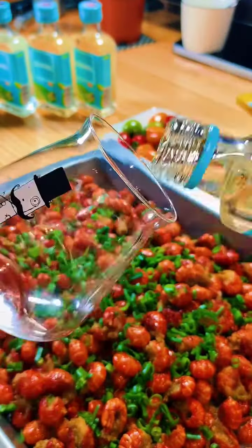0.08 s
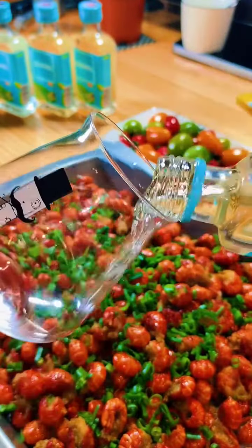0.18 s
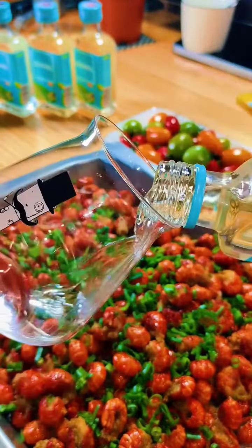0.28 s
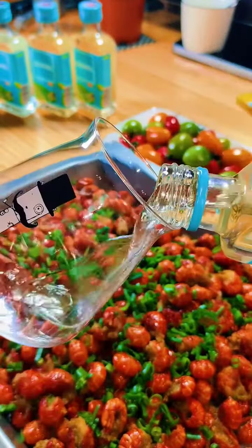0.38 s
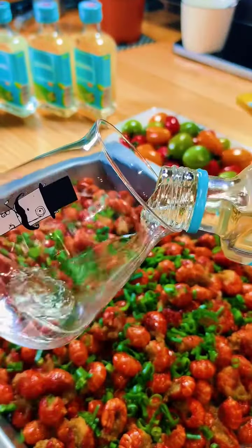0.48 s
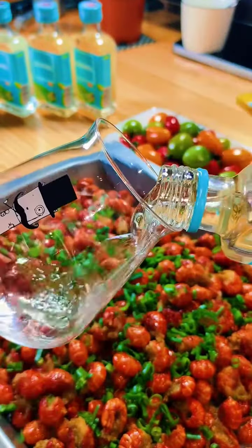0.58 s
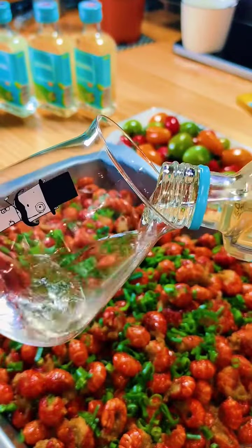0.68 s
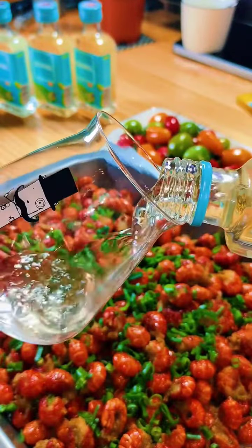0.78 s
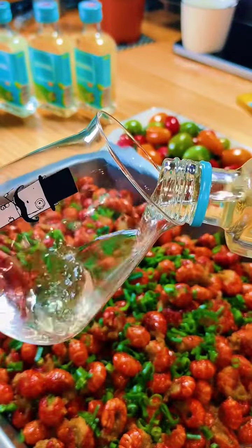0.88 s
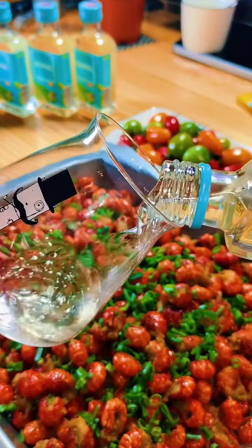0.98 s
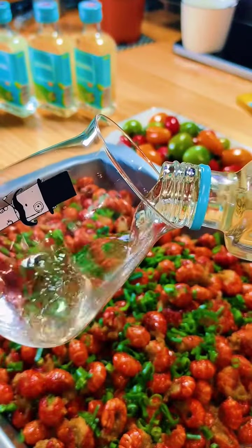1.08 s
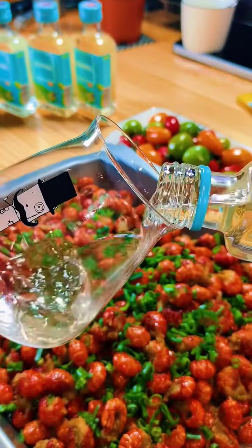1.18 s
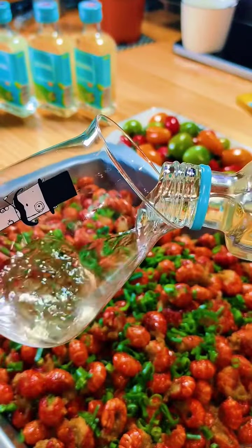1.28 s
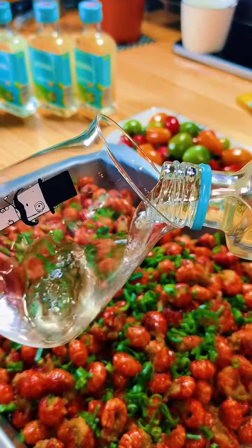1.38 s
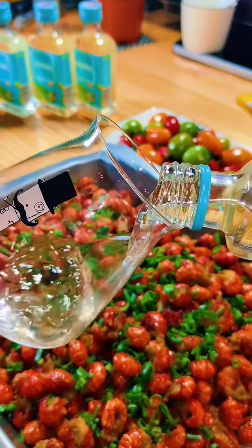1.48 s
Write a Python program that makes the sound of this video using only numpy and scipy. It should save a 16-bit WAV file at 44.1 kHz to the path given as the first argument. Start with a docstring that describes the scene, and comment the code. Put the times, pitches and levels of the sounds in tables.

```python
"""The dying modes of an earlier knock are cut off sharply, over filtered noise as the hum of a kitchen.
A faint stream swells; small ticks of bubbles, drops and glass, decaying sines in noise bursts, echo in
a noise tail. A bottle neck slides on the rim of a tilted glass jug (narrow-band noise), then clinks:
cracks of noise, decaying glass modes and a dense clatter. Air glugs into the bottle as rising tones that
excite resonant air spaces, while the pouring and the ticks go on."""
import sys
import numpy as np
from scipy import signal
from scipy.fft import rfft, irfft, next_fast_len
from scipy.io import wavfile
from scipy.ndimage import map_coordinates

SR = 44100
rng = np.random.default_rng(int(sys.argv[2]) if len(sys.argv) > 2 else 0)


def linear_from_db(decibels):
    """Turn decibels (scalar or array-like) into linear amplitude factors; 0 gives 1."""
    return 10 ** (np.asarray(decibels, float) / 20)


def master_out(mix):
    """Clip the mix to full scale and print it as 16-bit PCM to the path in sys.argv[1]."""
    frames = np.transpose(np.atleast_2d(mix))
    ceiling = np.clip(frames, -1, 1)
    pcm = np.round(ceiling * 32767).astype(np.int16)
    wavfile.write(sys.argv[1], SR, pcm)


N = 66150
BLOW_S = .2431  # when the neck strikes the rim

# Spectra give relative density; noise() scales the result to rms 1.
# likeness of left and right noise: (frequency [Hz], correlation [-1 to 1])
LIKENESS = [(60, .7), (300, 0.31), (2000, 0.55), (12000, 0.067)]
# modes of the earlier knock: (frequency [Hz], level re the whole ring [dB], t60 [s])
EARLIER_MODES = [(790, 0, 0.11), (2810, -2, 0.15), (3510, -13, 0.075), (4350, -46, 5.0), (5260, -9, 0.052),
                 (6406, -7.5, 0.091), (7084, -26, 0.092), (7000, -23, 0.072), (7550, -40, 0.12)]
# spectrum of the earlier hiss: (frequency [Hz], density [dB])
EARLIER_SPECTRUM = [(18, -30), (30, 3), (311, -8), (569, -20), (801, 3), (1590, -27), (2540, -4),
                    (4080, -32), (5590, -15), (16000, -53)]
# spectrum of the kitchen hum: (frequency [Hz], density [dB])
KITCHEN_SPECTRUM = [(15, -29.5), (25, -8.5), (60, -5.5), (120, -11.5), (250, -11.5), (500, -22),
                    (1000, -33.5), (2500, -33.5), (5000, -38.5), (8000, -48.5), (13000, -46), (16500, -49)]
# course of the kitchen hum: (time [s], level [dB])
KITCHEN_LEVEL = [(.07, -66.5), (.2, -59), (0.601, -61), (0.899, -58.5), (1.15, -59.5), (1.35, -61.5),
                 (1.5, -63)]
# spectrum of the stream's hiss: (frequency [Hz], density [dB])
HISS_SPECTRUM = [(250, -23), (400, 2.5), (900, -19.5), (2500, -8), (5000, -13.5), (7000, -18.5),
                 (11000, -15), (14000, -11), (15700, -12), (16500, -27)]
# strength of the flow: (time [s], level [dB])
FLOW = [(0.151, -30), (.3, -1.5), (.8, 0.5), (1.1, 0), (1.5, -11.5)]
# small ticks: bubbles, drops, soft jug tones near 590 Hz and a faint late glass ring:
# (time [s], frequency [Hz], level [dB], t60 [s], splash over the tone [dB])
TICKS = [(.200, 3610, -54.5, 0.013, -3.5), (.452, 604, -44, 0.074, -16), (.572, 913, -43, .12, -12.5),
         (.572, 1063, -53.5, 0.11, -13.5), (.622, 581, -48, 0.088, -12), (.752, 4020, -43.5, 0.033, -27),
         (.751, 4740, -46.5, 0.027, -8.5), (.759, 10590, -44.5, 0.061, 3), (.759, 13160, -48.5, 0.035, 4.5),
         (.827, 3833, -46, 0.032, -1.5), (.827, 575, -51, 0.071, -25), (.876, 6850, -48, 0.046, -4.5),
         (.876, 12130, -56, .025, 2.5), (.982, 597.4, -49, .08, -24), (1.031, 10500, -52, .05, -5),
         (1.030, 11540, -56, .04, 1.5), (1.030, 5013, -79, 0.037, 19.5), (1.043, 3780, -52, 0.054, -14),
         (1.279, 2683, -55.5, 0.33, -29), (1.337, 4610, -55, 0.046, -2), (1.338, 5750, -44.5, 0.037, -17)]
# reverberation of the kitchen: (frequency [Hz], t60 [s])
ROOM_T60 = [(200, 0.3), (1000, 0.33), (4000, 0.55), (10000, .25), (16000, .2)]
# spectrum of glass grinding or cracking on glass: (frequency [Hz], density [dB])
CRACK_SPECTRUM = [(60, -35), (150, -26.5), (500, -8.5), (1500, -0.5), (2400, -1), (4200, -4.5),
                  (6200, -11.5), (8500, 0), (10300, -20.5), (13000, -16), (16000, -21.5)]
# contacts that crack and briefly change the ring, mostly choking it:
# (time [s], crack level [dB], ring change [dB], width of the change [s])
CONTACTS = [(.2430, -4, -6.5, .002), (.2715, -29.5, 0, 0.0016), (0.299, -28, -2, .003),
            (0.314, -33, 2, 0.0059), (0.368, -44, -7.5, 0.002), (.391, -43, -2.5, 0.0016)]
# jug and bottle neck modes: (frequency [Hz], level [dB], t60 before the chatter's slowing [s],
# left-right difference [dB], unsteady share [0-1, anything above counts as 1])
GLASS_MODES = [(566.5, -33.5, 0.46, 3, .6), (591.4, -33, 0.35, 4.5, 1), (953, -25, 0.71, -13.5, .15),
               (1691, -33.5, 0.28, 0.5, .6), (2444, -34.5, 0.45, 4, 0.5), (2690, -24, 0.62, 10, 0.6),
               (2746.3, -10, 0.37, -11.5, .12), (2884, -29, .55, 5.5, 1), (4050, -42.5, 0.9, 2, 0),
               (4265, -24.5, 0.32, 9.5, 1), (3930, -29, .2, 0, 0), (4085, -28.5, 0.092, -3.5, 0.9),
               (4640, -45.5, .6, 0, 0.2), (4090, -39, .4, 1, 1.2), (4270, -36, 0.16, -0.5, 1.2),
               (7290, -38, 0.49, -4.5, 1.2), (8460, -39.5, .24, 2.5, 1.2), (9580, -41.5, 0.24, 1.5, 1.2),
               (12100, -37, .18, 3, .8), (14110, -34, .2, 1.5, .8), (15100, -41, 0.194, 3, .8)]
# spectrum of the dense small modes and their echo: (frequency [Hz], density [dB])
CLATTER_SPECTRUM = [(60, -24.5), (120, -11.5), (400, -18), (600, -5.5), (1300, -12), (2400, -6),
                    (3300, -14), (4200, 3), (5200, -11.5), (6400, -18.5), (7200, -5), (7800, -31),
                    (8500, -5), (10300, -24), (11500, -11), (13500, -6.5), (15500, -7.5), (16500, -32)]
# their decay before the chatter's slowing: (frequency [Hz], t60 [s])
CLATTER_T60 = [(100, 0.23), (600, .35), (2000, 0.26), (4200, .33), (6200, 0.33), (7300, 0.24),
               (10500, 0.16), (13000, 0.33), (16000, .14)]
# air bubbles entering the bottle: (time of peak [s], level ahead of the air spaces [dB],
# frequency at peak [Hz], growth [1/s], fall width [s])
GLUGS = [(.320, -46, 205, 70, .010), (.530, -35.5, 225, 80, .011), (.769, -36, 215, 70, .017),
         (.977, -36.5, 210, 100, .007), (1.260, -40.5, 180, 90, .010), (1.350, -52, 325, 1, .018)]
# air spaces of bottle and jug: (frequency [Hz], bandwidth [Hz], gain [dB])
AIR_SPACES = [(125, 24, 2), (204, 22, 6), (300, 32, 0)]


def along(points, hz):
    """Interpolation of (frequency, value) points on a logarithmic frequency axis."""
    f, v = np.transpose(points)
    return np.interp(np.log(hz + 1), np.log(f + 1), v)


def course(points):
    """Gain over time, interpolated linearly in dB between (time, level) points."""
    s, db = np.transpose(points)
    return linear_from_db(np.interp(np.arange(N) / SR, s, db))


def unit(x):
    """Normalisation to rms 1."""
    return x / np.sqrt(np.mean(x ** 2) + 1e-20)


def filtered(x, response):
    """Linear filtering: the spectrum times a complex response of frequency."""
    m = next_fast_len(N + SR // 2)
    return irfft(rfft(x, m) * response(np.fft.rfftfreq(m, 1 / SR)), m)[..., :N]


def peak(f, hz, width_hz):
    """Response of a damped, causal second-order resonator with gain 1 at its centre."""
    return 1j * f * width_hz / (hz * hz - f * f + 1j * f * width_hz + 1e-9)


def noise(spectrum):
    """Stereo noise of rms 1; the ratio of mid to side sets the correlation of the channels."""
    def mid_side(hz):
        angle = np.arccos(np.clip(along(LIKENESS, hz), -1, 1)) / 2
        return linear_from_db(along(spectrum, hz)) * np.array([np.cos(angle), np.sin(angle)])

    mid, side = filtered(rng.standard_normal((2, N)), mid_side)
    return unit(np.array([mid + side, mid - side]))


def since(s):
    """Elapsed time after s, and a switch that opens there."""
    t = np.arange(N) / SR - s
    return np.maximum(t, 0), t >= 0


def sides(db):
    """Left and right gains that share a level difference symmetrically."""
    return linear_from_db(np.array([[db / 2], [-db / 2]]))


def wobble(rate, rows):
    """Band-limited random motion: splines through rate knots a second, at most 260."""
    knots = rng.standard_normal((rows, 400))
    return np.array([map_coordinates(k, [np.arange(N) * min(rate, 260) / SR]) for k in knots])


def earlier():
    """Free decay of modes and hiss over a background of kitchen noise, until a sharp cut."""
    ring_db, hiss_db, background_db = -40, -39, -50.5
    hiss_t60_s, cut_s = .12, .0655
    t = np.arange(N) / SR
    ring = np.zeros((2, N))
    for hz, db, t60 in EARLIER_MODES:
        phase = rng.uniform(0, 2 * np.pi, (2, 1))
        ring += linear_from_db(db - 60 * t / t60) * np.sin(2 * np.pi * hz * t + phase)
    hiss = linear_from_db(hiss_db - 60 * t / hiss_t60_s) * noise(EARLIER_SPECTRUM)
    background = linear_from_db(background_db) * noise(KITCHEN_SPECTRUM)
    return (linear_from_db(ring_db) * ring + hiss + background) * (t < cut_s)


def kitchen():
    """Stationary coloured noise under a slow level curve: the hum of the room."""
    return course(KITCHEN_LEVEL) * noise(KITCHEN_SPECTRUM)


def stream():
    """Turbulent hiss and a noise-driven resonance, the jug's air tone, both follow the flow."""
    tone_db, hiss_db = -69, -73.5  # at a flow of 0 dB
    air = unit(filtered(rng.standard_normal((2, N)), lambda f: peak(f, 584, 14)))  # Hz, width Hz
    tone = linear_from_db(tone_db + 2.8 * wobble(10.27, rows=1)) * air
    hiss = linear_from_db(hiss_db + 0.83 * wobble(25, rows=1)) * noise(HISS_SPECTRUM)
    return course(FLOW) * (tone + hiss)


def ticks():
    """Each tick is a damped oscillation inside a short splash of nearby noise."""
    pitch_rise, phase_wander_rad = .015, 1.7
    splash_t60_s, splash_width = .038, .3  # width as a share of the frequency
    attack_cycles = 2
    out = np.zeros((2, N))
    for s, hz, db, t60, splash_db in TICKS:
        t, on = since(s)
        cycles = hz * t * (1 + pitch_rise * np.minimum(t / t60, 1))
        phase = 2 * np.pi * cycles + phase_wander_rad * wobble(200, rows=2)
        tone = linear_from_db(-60 * t / t60) * np.sin(phase)
        spray = unit(filtered(rng.standard_normal((2, N)), lambda f: peak(f, hz, hz * splash_width) ** 2))
        splash = linear_from_db(splash_db - 60 * t / splash_t60_s) * spray
        attack = 1 - np.exp(-t * hz / attack_cycles)
        out += linear_from_db(db) * on * attack * (tone + splash)
    return out


def room(x):
    """Reverberation: convolution with a noise tail whose every frequency decays at its own rate."""
    hz, t, z = signal.stft(rng.standard_normal((2, SR * 2 // 3)), SR, nperseg=256)
    fade = linear_from_db(-60 * t / along(ROOM_T60, hz)[:, None])
    tail = signal.istft(z * fade, SR, nperseg=256)[1]
    delayed = np.pad(x, (130, 0))[None]  # samples before the first reflection
    return signal.fftconvolve(delayed, tail / np.linalg.norm(tail[0]), axes=1)[:, :N]


def slide():
    """Friction: the neck rubs on the rim, a noisy resonance with grit that grows until the blow."""
    start_s, end_db, rise_db_per_s, grit_db = .203, -36.5, 650, -10
    before = np.minimum(np.arange(N) / SR - BLOW_S, 0)
    rub = unit(filtered(rng.standard_normal(N), lambda f: peak(f, 4235, 150) ** 2))  # Hz, width Hz
    sliding = since(start_s)[1] * ~since(BLOW_S)[1]
    level = linear_from_db(end_db + rise_db_per_s * before)
    return sliding * level * (rub + linear_from_db(grit_db) * noise(CRACK_SPECTRUM))


def cracks():
    """Impact noise: each contact releases a broadband burst that decays exponentially."""
    t60_s = .012
    out, grit = np.zeros((2, N)), noise(CRACK_SPECTRUM)
    for s, db, _, _ in CONTACTS:
        t, on = since(s)
        out += on * linear_from_db(db - 60 * t / t60_s) * grit
    return out


def decay_time():
    """Slowed decay: the neck chatters on the rim and keeps feeding the ring until it lifts."""
    chatter_s, decay_share = .087, .24
    t, _ = since(BLOW_S)
    return np.minimum(t, chatter_s) * decay_share + np.maximum(t - chatter_s, 0)


def glass_ring():
    """Modal decay of the struck glass; liquid on the jug wall damps the low modes further."""
    flutter_hz, flutter_per_hz = 20, .025  # knots a second, and more of them with pitch
    side_phase, side_phase_hz = .8, 1000  # rad either way, less above this frequency
    wet_s, wet_db_per_s, wet_hz = .52, 158, 880  # damping weakens above wet_hz
    t, _ = since(BLOW_S)
    aged, out = decay_time(), np.zeros((2, N))
    for hz, db, t60, pan, share in GLASS_MODES:
        share = np.clip(share, 0, 1)
        w = wobble(flutter_hz + flutter_per_hz * hz, rows=4)
        flutter = (w[:2] + 1j * w[2:]) / np.sqrt(2)
        offset = side_phase * min(side_phase_hz / hz, 1) ** 2 * np.array([[1], [-1]])
        swing = np.sqrt(1 - share ** 2) * np.exp(1j * offset) + share * flutter
        wet_db = wet_db_per_s * min(wet_hz / hz, 1) ** 2 * since(wet_s)[0]
        level = sides(pan) * linear_from_db(db - 60 * aged / t60 - wet_db)
        out += level * np.imag(swing * np.exp(2j * np.pi * hz * t))
    choke_db = np.zeros(N)
    for s, _, change, width in CONTACTS:
        choke_db += change * np.exp(-.5 * ((np.arange(N) / SR - s) / width) ** 2)
    return out * linear_from_db(choke_db)


def clatter():
    """High modal density: the small modes of both glasses and their echo merge into fading noise."""
    start_db, scatter_db = -20, 3.5  # scatter: how unevenly the modes stand out

    def uneven(f):
        return linear_from_db(scatter_db * np.interp(f, np.arange(800) * 28, rng.standard_normal(800)))

    dense = unit(filtered(noise(CLATTER_SPECTRUM), uneven))
    hz, frames, z = signal.stft(dense, SR, nperseg=256)
    aged = np.interp(frames, np.arange(N) / SR, decay_time())
    fade = linear_from_db(-60 * aged / along(CLATTER_T60, hz)[:, None])
    return linear_from_db(start_db) * signal.istft(z * fade, SR, nperseg=256)[1][:, :N]


def clink():
    """Impact excitation: a slide leads in, contacts crack and the blow sets all modes ringing."""
    attack_s = .0014
    onset = 1 - np.exp(-since(BLOW_S)[0] / attack_s)
    return slide() + cracks() + (glass_ring() + clatter()) * onset


def glugs():
    """A bubble's tone sweeps up to a ceiling as it pinches off and sets the air spaces resonating."""
    rise_s, ceiling_hz = .012, 370
    out = np.zeros(N)
    for s, db, hz, growth, fall in GLUGS:
        t = np.arange(N) / SR - s
        pitch = ceiling_hz / (1 + (ceiling_hz / hz - 1) * np.exp(-growth * np.clip(t, -.1, .1)))
        shape = np.exp(-.5 * (t / np.where(t < 0, rise_s, fall)) ** 2)
        phase = 2 * np.pi * np.cumsum(pitch) / SR
        out += linear_from_db(db) * shape * np.cos(phase - phase[round(s * SR)])
    return filtered(out, lambda f: 1 + sum(linear_from_db(db) * peak(f, hz, w) for hz, w, db in AIR_SPACES))


def scene():
    """Superposition of all sources; the clatter holds the clink's echo, ticks and glugs get the room's."""
    echo_db = -7.5
    near = ticks() + glugs()
    echo = linear_from_db(echo_db) * room(near.mean(0))
    return earlier() + kitchen() + stream() + near + echo + clink()


def top_cut(x):
    """Nothing passes above the cut-off."""
    return signal.sosfilt(signal.butter(12, 16660, fs=SR, output="sos"), x)


def record(dry):
    """Saturation bends peaks smoothly towards a ceiling; a steep low-pass then limits the band."""
    ceiling, hardness, top_hz = .93, 8, 15750
    clipped = dry / (1 + np.abs(dry / ceiling) ** hardness) ** (1 / hardness)
    limited = filtered(clipped, lambda hz: 1 / (1 + (hz / top_hz) ** 80))
    return top_cut(limited)


dry = scene()
out = record(dry)
master_out(out)
```